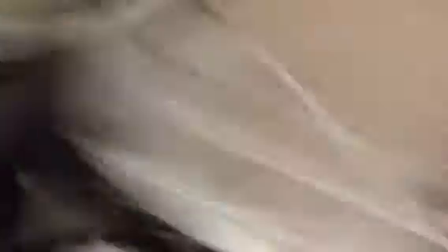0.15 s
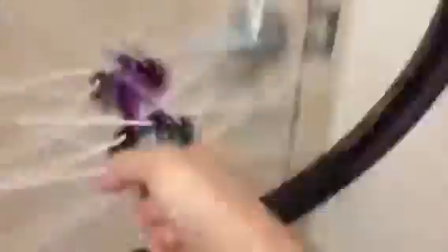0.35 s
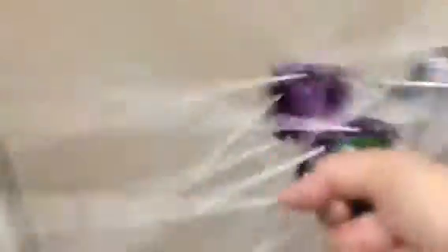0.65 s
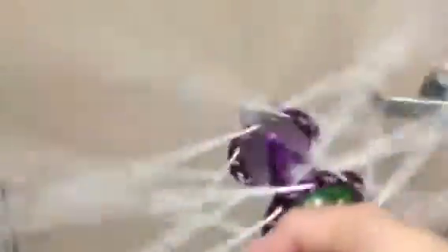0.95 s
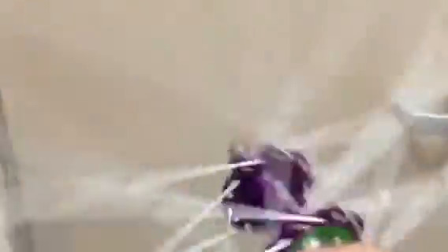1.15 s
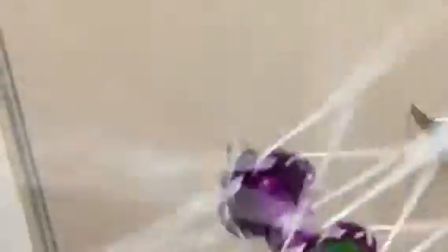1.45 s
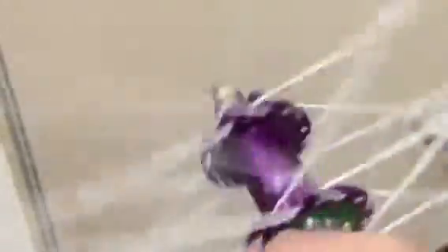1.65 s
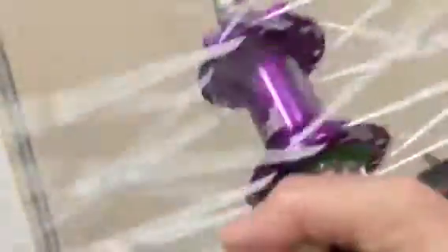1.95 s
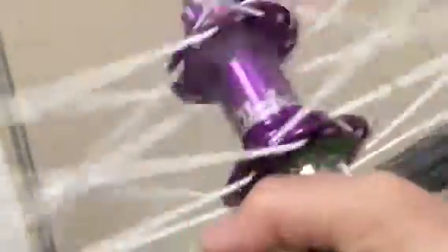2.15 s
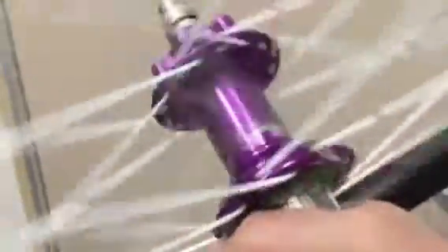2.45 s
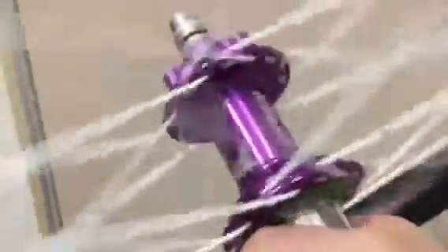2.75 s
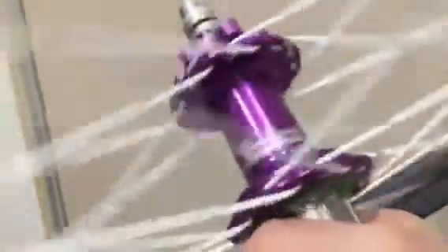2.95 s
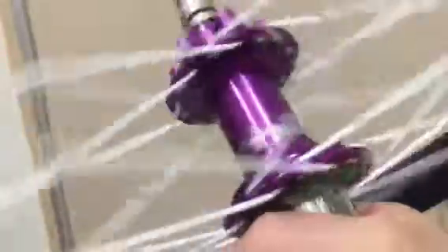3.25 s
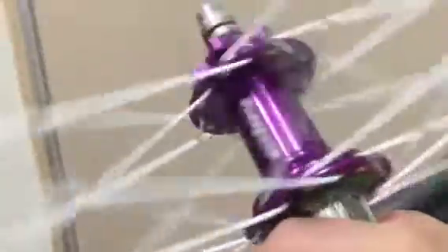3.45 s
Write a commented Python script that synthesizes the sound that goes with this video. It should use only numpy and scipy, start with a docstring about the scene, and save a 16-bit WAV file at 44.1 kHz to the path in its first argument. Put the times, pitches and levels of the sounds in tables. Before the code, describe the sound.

A bicycle freehub ratchets loudly throughout, already spinning at 0 s: crisp metallic pawl clicks, about 140 per second, fuse into a bright, raspy buzz with ringing hub and spokes. Dull handling knocks fall at 0.1 and 0.19 s, a much fainter one at 0.65 s. The buzz slows gradually to about 100 clicks per second by 3.6 s, still running, close-miked in a hard room with faint low rumble and hum.

```python
"""A hard room with a low rumble, a faint hum and room tone, all shaped noise, lies under the whole scene.
From the start a held bicycle wheel spins on: pawls snap over ratchet teeth in a fast buzz of noise bursts,
clicks and ringing hub and spoke modes, with a thump and a tick passed on by the hand.
At 0.10 s and 0.19 s come two dull handling knocks, at 0.65 s a much fainter one: decaying sines.
The buzz slows to the end, swelling slightly once a turn, its room tails always changing."""
import sys
import numpy as np
from scipy import signal
from scipy.fft import rfft, irfft, next_fast_len
from scipy.io import wavfile
from scipy.ndimage import uniform_filter1d

SR = 44100
rng = np.random.default_rng(int(sys.argv[2]) if len(sys.argv) > 2 else 0)


def materialize(psi):
    """Save the field psi as 16-bit PCM at rate SR to the path in sys.argv[1].

    A 1-D psi becomes a single channel; in a 2-D psi each row is a channel.
    """
    bounded = np.clip(np.atleast_2d(psi).T, -1, 1)
    quanta = np.round(bounded * 32767).astype(np.int16)
    wavfile.write(sys.argv[1], SR, quanta)


def invert_db(x):
    """Field ratio 10**(x/20) for x, a level in decibels (scalar or array-like)."""
    u = np.asarray(x, float) / 20
    return 10 ** u


N = 158760

# low rumble before its chance wavering: (time [s], level [dB])
RUMBLE_LEVEL = [(0.03, -63), (0.12, -29), (0.15, -46), (0.2, -32.5), (0.49, -62), (0.71, -48), (0.74, -60),
                (1.93, -66.5), (2.23, -57), (2.25, -72), (3.57, -55)]
# spectrum of the room tone: (frequency [Hz], relative density [dB per Hz])
ROOM_TONE = [(40, -14), (85, -11), (119, 0), (195, -6), (300, -11), (420, -18), (700, -17.5), (1100, -15),
             (1400, -40)]
ROOM_TONE_DB = -51
HUM_HZ, HUM_WIDTH_HZ, HUM_DB = 273.6, 54, -60.5

# turning of the ratchet: (time [s], teeth passed [count])
RATCHET_TURN = [(0, -.8), (.2, 27.28), (.4, 54.72), (.6, 82.14), (.9, 122.32), (1.2, 162.25), (1.3, 174.92),
                (1.5, 197.35), (1.7, 219.18), (1.8, 230.05), (2.0, 254.16), (2.1, 265.93), (2.3, 289.44),
                (2.4, 300.63), (2.6, 322.73), (2.8, 344.28), (2.9, 354.52), (3.1, 374.92), (3.3, 394.67),
                (3.6, 423.6)]
INERTIA_S = 0.08  # smooths the turning
TEETH, LOUDEST_TOOTH, SWELL_DB = 24, 14, 0.27
# pawls falling one after another on a tooth: (lag [s], level [dB])
PAWL_FALLS = [(0, -2), (.0009, -6), (.0024, -10), (.0045, -12)]
ODD_TOOTH_DB, ODD_EARLY_TEETH = -3.5, 0.12  # two sets of pawls take turns, one weaker and a little early
TOOTH_JITTER_S, LAG_JITTER_S, TICK_JITTER_S = 0.00008, 0.0005, 0.00015
SNAP_SPREAD_DB, MODE_SPREAD_DB, TICK_SPREAD_DB = 1.6, 3.0, 2.5

# colour of the snap: (frequency [Hz], relative density [dB per Hz])
SNAP_COLOUR = [(590, -39.5), (1000, -3.5), (1230, -9), (1410, -12), (1700, -4.5), (2290, -4.5), (3170, -1),
               (3720, -0.5), (3990, -2), (5020, -16.5), (5380, -11), (6030, -1), (7010, 1), (8930, 4),
               (10600, -4), (12300, 2), (15700, 2)]
SNAP_DB, SNAP_T60_S, RING_DB = 3, 0.0072, 1.5
# ringing modes of hub and spokes: (frequency [Hz], width [Hz], relative level per Hz of width [dB])
HUB_MODES = [(1223, 18, -10), (1265, 14, -11), (1340, 35, -13), (1518, 32, -9.5), (1690, 150, -8.5),
             (2050, 60, -9), (2443, 45, -11), (2785, 70, -9), (3060, 60, -7), (3170, 80, -8),
             (3320, 70, -7), (3940, 80, -6.5), (4365, 35, -11), (4540, 80, -9), (4780, 60, -10),
             (5350, 120, -4.5), (5770, 130, -6), (6560, 170, -5), (6850, 140, -3), (7048, 110, -3),
             (7270, 60, -4), (7740, 200, -6), (8420, 180, -6), (8735, 190, -5), (9230, 220, -3),
             (12100, 350, -12.5), (13600, 550, -12), (15600, 300, -9)]
TURN_WAVER_DB, TURN_WAVER_HZ = 1.6, 8
# sharp click of the first pawl, against the snaps and rings: (time [s], level [dB])
CLICK_LEVEL = [(0, -17), (1.3, -16), (2.4, -13), (3, -9), (3.6, -10)]
EDGE_HZ = 1195  # the hub radiates little below
SPOKE_HZ, SPOKE_WIDTH_HZ, SPOKE_DB = 1133, 8, -31.5

# room against the direct sound as the microphone moves: (time [s], level [dB])
ROOM_LEVEL = [(0, 0), (1.2, 3), (1.9, 0), (2.6, -1), (3.6, -0.5)]
ROOM_T60_S, ROOM_BLOCK_S, WALL_CUT_HZ = 0.61, 0.12, 11800
# borders between the four bands of the buzz: frequency [Hz]
BAND_BORDERS = [2500, 4500, 10000]
# those bands, low to high: (extra room [dB], spread of each snap [dB])
BAND_ROOM = [(5, 1.0), (2.5, 1.5), (.5, 1.5), (3, 1.2)]
TOP_DB = -0.5  # the highest band against the one below
# buzz: (time [s], level [dB], low band against it [dB], middle band against it [dB])
BUZZ_LEVEL = [(0.03, -25.5, -7.5, -6.5), (0.07, -24.5, -7, -8.5), (0.22, -21, -7.5, -12.5),
              (0.28, -20, -15, -11.5), (0.35, -24, -14, -7), (0.41, -22.5, -16, -12),
              (0.58, -22, -13.5, -12.5), (0.77, -22.5, -15, -15), (0.81, -23, -14.5, -14),
              (1.09, -22.5, -15.5, -16), (1.13, -24, -11.5, -14), (1.25, -22.5, -13, -17.5),
              (1.31, -23, -11.5, -17), (1.59, -22.5, -14.5, -13.5), (1.62, -20, -15.5, -13.5),
              (1.75, -23, -11.5, -13.5), (1.78, -22, -11, -12.5), (2.07, -20.5, -15.5, -13),
              (2.63, -20.5, -12, -15), (2.65, -21, -8.5, -15), (2.71, -20.5, -14, -12),
              (3.48, -20, -13, -12), (3.54, -22, -10, -10), (3.57, -21, -15.5, -11.5)]
# boost of three ringing bands: (time [s], near 3.2 kHz [dB], near 5.4 kHz [dB], near 7 kHz [dB])
RINGING_BOOST = [(0, -3.5, -11, -0.5), (.65, 0.5, 1, -2), (.85, 5, -1.5, -0.5), (1.5, 3, 4, 1.5),
                 (1.63, 0, 9, 0.5), (1.8, 1, 4.5, 1.5), (2.2, 2.5, 0.5, -2), (2.8, -0.5, -0.5, -1.5),
                 (3.6, -1, -1, -5)]
# edges of those ringing bands: (low [Hz], high [Hz])
RINGING_BANDS = [(2800, 3600), (5250, 5450), (6500, 7500)]
# what the hand passes on, ahead of the trims below: (time [s], thump [dB], tick [dB])
HAND_LEVEL = [(0.0, -54, -65), (0.27, -61, -58), (0.48, -71, -60), (0.69, -63, -55.5), (1.1, -49, -55.5),
              (1.33, -56, -54.5), (1.57, -48, -54), (1.87, -54, -54), (2.24, -47, -48.5),
              (2.5, -48.5, -52.5), (2.8, -49.5, -49.5), (3.25, -48, -48.5), (3.6, -49, -51)]
THUMP_TRIM_DB, THUMP_WAVER_DB, THUMP_WAVER_HZ, TICK_TRIM_DB = -2, 3.0, 16, -1.5

# knocks: (time [s], thud height [dB], thud push +1 or pull -1 [sign], thud pitch [Hz], tap pitch [Hz],
#          tap t60 [s], tap against thud [dB], crack pitch [Hz])
KNOCK_HITS = [(0.1003, -19, -1, 76, 680, 0.042, -5, 555), (0.1877, -19, 1, 76, 412, 0.012, 0.5, 840),
              (0.648, -37.5, 1, 129, 230, 0.031, -8, 300)]
THUD_T60_S, THUD_LATE_S, CRACK_T60_S, CRACK_DB = 0.065, 0.0033, 0.0037, 7  # crack level against thud


def rms_one(x):
    """Scale to rms 1."""
    return x / np.sqrt(np.mean(x ** 2) + 1e-20)


def in_time(rows):
    """Columns of a curve, sample by sample."""
    s, *columns = np.transpose(rows)
    return [np.interp(np.arange(N) / SR, s, c) for c in columns]


def colour(x, points):
    """Minimum-phase filter with the given spectrum, so bursts keep their sharp onset."""
    size = next_fast_len(N + SR)
    hz, db = np.transpose(points)
    bins_hz = np.arange(size // 2 + 1) * SR / size
    curve_db = np.interp(np.log(bins_hz + 1), np.log(hz), np.maximum(db, -70))
    cepstrum = irfft(np.log(invert_db(curve_db)), size)
    # folding the cepstrum forward makes the phase minimal
    cepstrum[1:size // 2] *= 2
    cepstrum[size // 2 + 1:] = 0
    return irfft(rfft(x, size) * np.exp(rfft(cepstrum)), size)[:N]


def band(x, low_hz, high_hz):
    """Band-pass."""
    return signal.sosfilt(signal.butter(2, [low_hz, high_hz], "band", fs=SR, output="sos"), x + 1e-18)


def drift(rate_hz):
    """Slow random wavering, rms 1, drawn every 40 samples."""
    r = np.exp(-80 * np.pi * rate_hz / SR)
    slow = signal.lfilter([1], [1, -2 * r, r * r], rng.standard_normal(N // 40 + 2002))[2000:]
    return np.interp(np.arange(N) / 40, np.arange(len(slow)), rms_one(slow))


def rumble():
    """Low noise whose level follows its curve and wavers by chance."""
    level_db, = in_time(RUMBLE_LEVEL)
    low_noise = rms_one(band(rng.standard_normal(N), 43, 96))
    return low_noise * invert_db(level_db + 2 * drift(5))


def hum():
    """A faint hum in the room: a narrow band of noise."""
    noise = rng.standard_normal(N)
    return invert_db(HUM_DB) * rms_one(band(noise, HUM_HZ - HUM_WIDTH_HZ / 2, HUM_HZ + HUM_WIDTH_HZ / 2))


def room_tone():
    """Steady noise in the colour of the room."""
    return invert_db(ROOM_TONE_DB) * rms_one(colour(rng.standard_normal(N), ROOM_TONE))


def train(s, sizes):
    """Clicks of given sizes at given times."""
    out = np.zeros(N)
    inside = (s >= 0) & (s * SR < N - 1)
    np.add.at(out, (s[inside] * SR).astype(int), sizes[inside])
    return out


def ring(clicks, hz, t60):
    """A two-pole resonator: each unit click sets off a decaying sine of height 1."""
    r, w = invert_db(-60 / (t60 * SR)), 2 * np.pi * hz / SR
    return signal.lfilter([0, np.sin(w)], [1, -2 * r * np.cos(w), r * r], clicks + 1e-18)


def width_t60(width_hz):
    """The narrower a resonance, the longer it rings."""
    return np.log(1000) / (np.pi * width_hz)


def snap_bursts(s, db):
    """Each pawl impact releases a short, decaying burst of coloured noise."""
    fade = signal.lfilter([1], [1, -invert_db(-60 / (SNAP_T60_S * SR))], train(s, invert_db(db)) + 1e-18)
    return rms_one(colour(fade * rng.standard_normal(N), SNAP_COLOUR))


def hub_ringing(s, db):
    """Each pawl strikes the modes of hub and spokes with random strength and sign."""
    rings = 0
    for hz, width_hz, mode_db in HUB_MODES:
        strike_db = db + MODE_SPREAD_DB * rng.standard_normal(s.shape)
        strikes = invert_db(strike_db) * rng.choice([-1, 1], s.shape)
        waver = invert_db(TURN_WAVER_DB * drift(TURN_WAVER_HZ))
        mode = ring(train(s, strikes) * waver, hz, width_t60(width_hz))
        rings = rings + invert_db(mode_db) * np.sqrt(width_hz) * rms_one(mode)
    return rms_one(rings)


def first_click(s, db):
    """The first pawl on each tooth adds a sharp, high click."""
    return invert_db(in_time(CLICK_LEVEL)[0]) * rms_one(band(train(s[:, 0], invert_db(db[:, 0])), 6500, 11500))


def room(x):
    """Decaying noise tails, duller above the wall cut; wheel and microphone move, so they keep changing."""
    t, hop = np.arange(SR // 2) / SR, int(ROOM_BLOCK_S * SR)
    r, out = np.exp(-2 * np.pi * WALL_CUT_HZ / SR), np.zeros(N + 2 * SR)
    padded = np.pad(x, (4 * hop, 2 * hop), mode="reflect")
    window = np.sin(np.pi * np.arange(2 * hop) / (2 * hop))
    for i in range(0, N + 4 * hop, hop):
        # a fresh tail for each overlapping block, after a 3 ms gap
        decay = invert_db(-60 * t / ROOM_T60_S) * (t > .003)
        tail = signal.lfilter([1], [1, -r], rng.standard_normal(len(t)) * decay)
        wet = signal.fftconvolve(padded[i:i + 2 * hop] * window, tail / np.sqrt(np.sum(tail ** 2)))
        out[i:i + len(wet)] += wet
    return out[4 * hop:4 * hop + N]


def split(x):
    """Four bands that add up to the input."""
    below = [signal.sosfiltfilt(signal.butter(3, hz, fs=SR, output="sos"), x) for hz in BAND_BORDERS]
    return np.diff([0 * x, *below, x], axis=0)


def bands_in_room(direct, tooth, count):
    """In each band the direct sound varies from tooth to tooth and mixes with its own share of room."""
    wet = invert_db(in_time(ROOM_LEVEL)[0]) * room(direct)
    mixed = []
    for near, far, (more_db, spread_db) in zip(split(direct), split(wet), BAND_ROOM):
        tooth_gain = invert_db(spread_db * rng.standard_normal(count))[tooth]
        mixed.append(rms_one(near * uniform_filter1d(tooth_gain, size=40) + invert_db(more_db) * far))
    return mixed


def ringing_boost(buzz):
    """Three ringing bands rise and fall in turn."""
    for edges_hz, ring_db in zip(RINGING_BANDS, in_time(RINGING_BOOST)):
        band_filter = signal.butter(2, edges_hz, "band", fs=SR, output="sos")
        buzz = buzz + (invert_db(ring_db) - 1) * signal.sosfiltfilt(band_filter, buzz)
    return buzz


def spoke_ring(s, strikes):
    """A steady narrow ring under the hub's edge, kept going by every pawl."""
    spoke = ring(train(s, strikes), SPOKE_HZ, width_t60(SPOKE_WIDTH_HZ))
    return invert_db(SPOKE_DB) * rms_one(band(spoke, SPOKE_HZ / 1.05, SPOKE_HZ * 1.05))


def hand(s, db):
    """The hand passes on a low thump and a tick for each tooth."""
    thump_db, tick_db = in_time(HAND_LEVEL)
    strikes = train(s, invert_db(db))
    waver_db = THUMP_WAVER_DB * drift(THUMP_WAVER_HZ)
    thump = rms_one(band(strikes, 77.5, 155)) * invert_db(thump_db + THUMP_TRIM_DB + waver_db)
    tick = rms_one(band(strikes, 250, 1050)) * invert_db(tick_db + TICK_TRIM_DB)
    return thump + tick


def freehub():
    """The turning ratchet times the pawls; their snaps, clicks and rings make the buzz."""
    (turn,), (level_db, low_db, mid_db) = in_time(RATCHET_TURN), in_time(BUZZ_LEVEL)
    turn = np.pad(turn, SR, mode="reflect", reflect_type="odd")
    turn = uniform_filter1d(turn, int(INERTIA_S * SR))[SR:-SR]
    count = 600  # more teeth than pass; the unused ones land outside the scene
    odd = np.arange(count) % 2
    tooth_s = np.interp(np.arange(count) - ODD_EARLY_TEETH * odd, turn, np.arange(N) / SR, left=-9, right=-9)

    lag, pawl_db = np.transpose(PAWL_FALLS)
    chance = np.clip(rng.standard_normal((count, len(lag), 2)), -2, 2)
    s = tooth_s[:, None] + lag + chance[..., 0] * np.where(lag > 0, LAG_JITTER_S, TOOTH_JITTER_S)
    odd_db = ODD_TOOTH_DB * odd
    db = pawl_db + odd_db[:, None] + SNAP_SPREAD_DB * chance[..., 1]

    bright = invert_db(SNAP_DB) * snap_bursts(s, db) + invert_db(RING_DB) * hub_ringing(s, db) + first_click(s, db)
    bright = signal.sosfilt(signal.butter(9, EDGE_HZ, "high", fs=SR, output="sos"), bright)
    tooth = np.clip(turn.astype(int), 0, count - 1)
    low, mid, high, top = bands_in_room(bright, tooth, count)
    buzz = rms_one(high + invert_db(TOP_DB) * top) + invert_db(low_db) * low + invert_db(mid_db) * mid
    buzz = ringing_boost(buzz) + spoke_ring(s, invert_db(db) * np.sign(chance[..., 0]))

    swell_db = SWELL_DB * np.cos(2 * np.pi * (turn - LOUDEST_TOOTH) / TEETH)  # once a turn
    hand_s = s[:, 0] + TICK_JITTER_S * chance[:, 1, 0]
    return invert_db(level_db + swell_db) * buzz + hand(hand_s, odd_db / 2 + TICK_SPREAD_DB * chance[:, 0, 1])


def knocks():
    """A crack, a short tap and a low thud that starts a little later, all decaying sines, dulled."""
    out = 0
    for s, db, way, thud_hz, tap_hz, tap_t60, tap_db, crack_hz in KNOCK_HITS:
        size = invert_db(np.array([db]))
        hit, late = train(np.array([s]), size), train(np.array([s + THUD_LATE_S]), size)
        crack = invert_db(CRACK_DB) * ring(hit, crack_hz, CRACK_T60_S)
        tap = invert_db(tap_db) * ring(hit, tap_hz, tap_t60)
        thud = np.sign(way) * ring(late, thud_hz, THUD_T60_S)
        out = out + crack + tap + thud
    return signal.sosfilt(signal.butter(3, 1150, fs=SR, output="sos"), out)


def scene():
    """Room bed, freehub and knocks together, in one channel."""
    return (rumble() + hum() + room_tone() + freehub() + knocks())[None]


def top_cut(x):
    """Nothing passes above the cut-off."""
    return signal.sosfilt(signal.butter(12, 17110, fs=SR, output="sos"), x)


def record(dry):
    """The lows roll off below 50 Hz and the top is cut steeply at 15.7 kHz."""
    mix = signal.sosfilt(signal.butter(4, 50, "high", fs=SR, output="sos"), dry)
    mix = signal.sosfilt(signal.ellip(14, .5, 75, 15720, fs=SR, output="sos"), mix)
    return top_cut(mix)


dry = scene()
out = record(dry)
materialize(out)
```